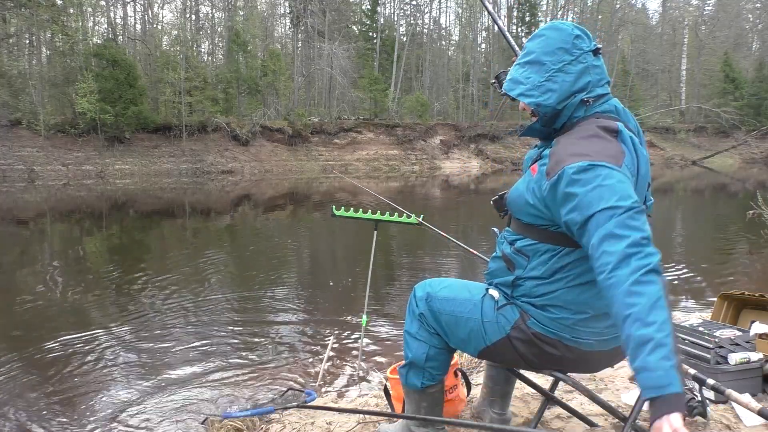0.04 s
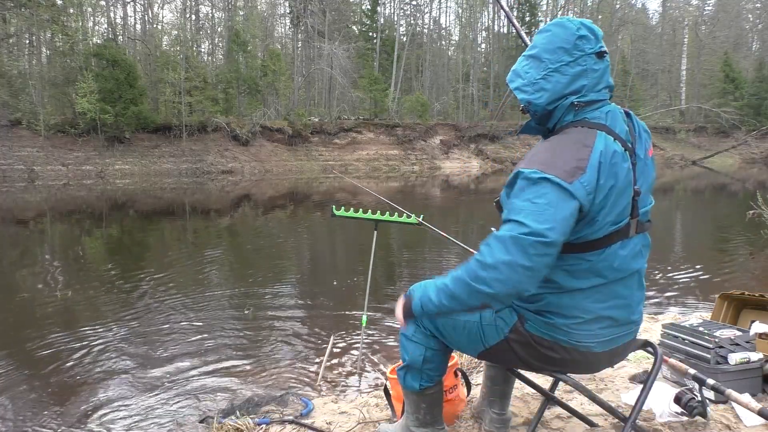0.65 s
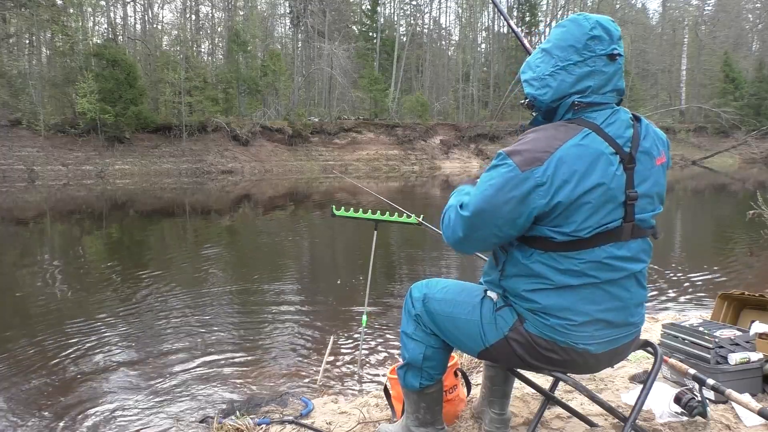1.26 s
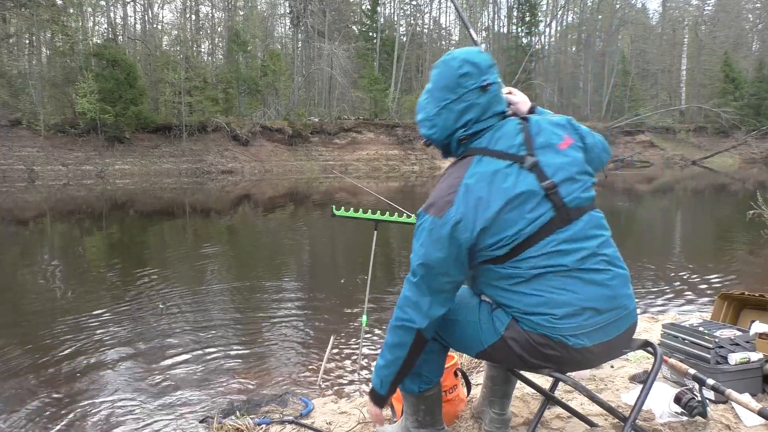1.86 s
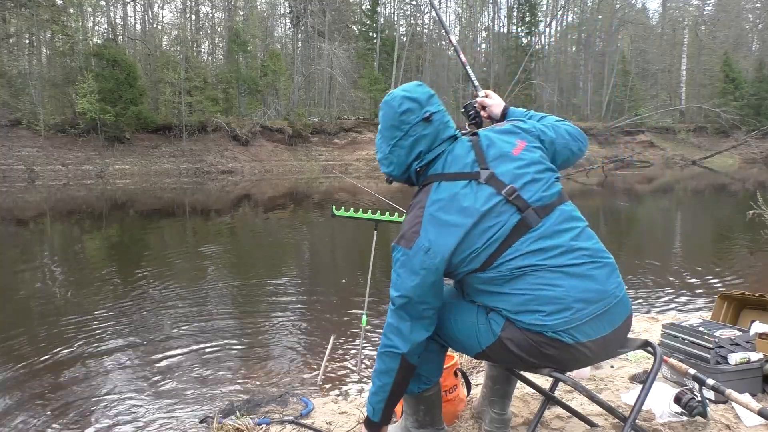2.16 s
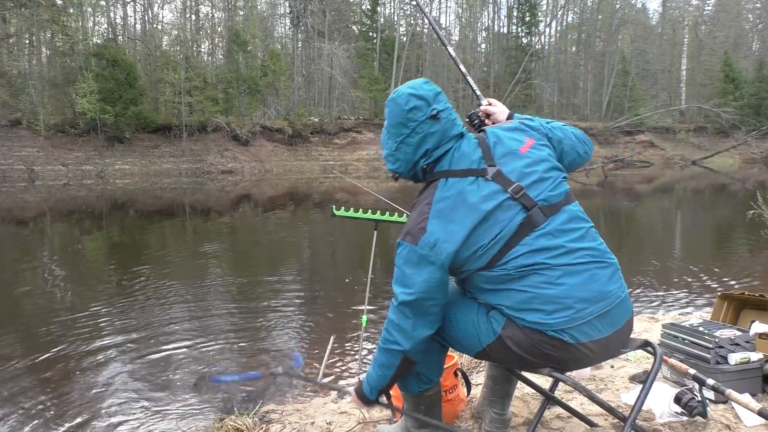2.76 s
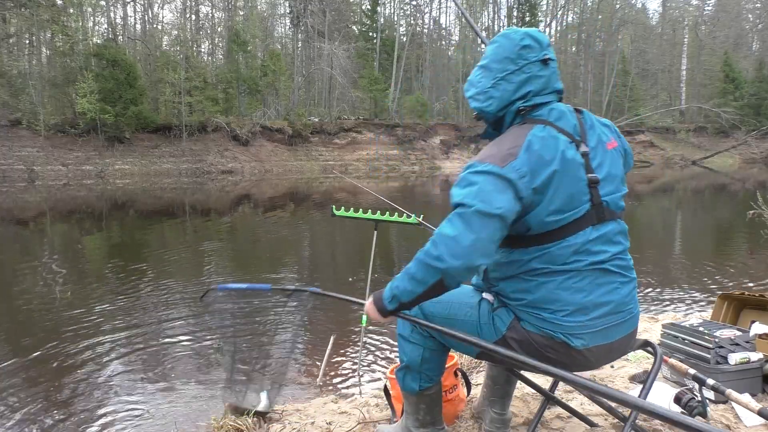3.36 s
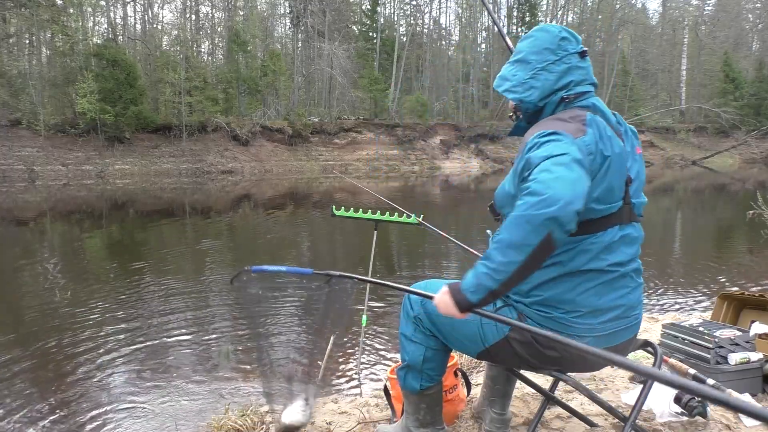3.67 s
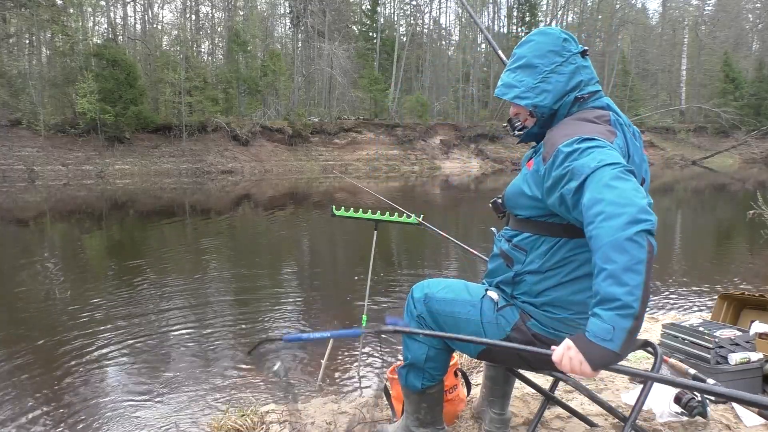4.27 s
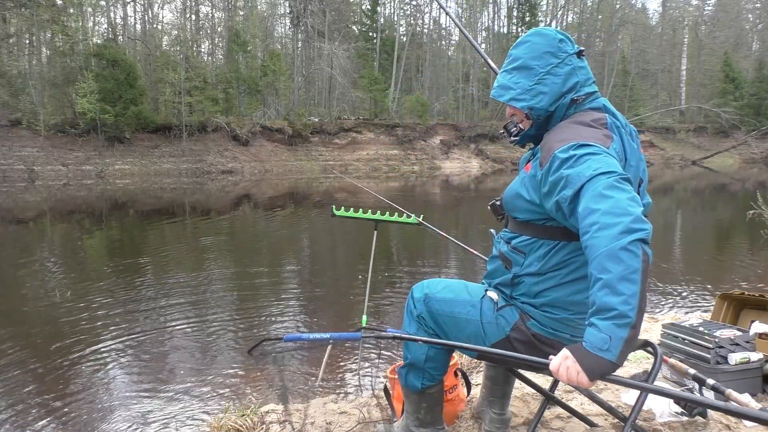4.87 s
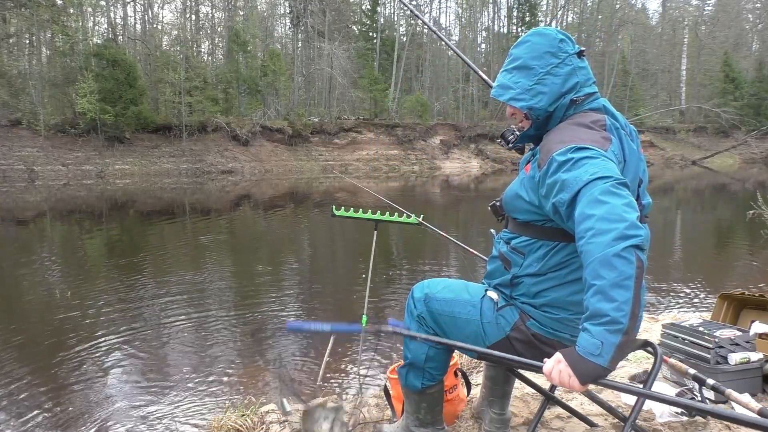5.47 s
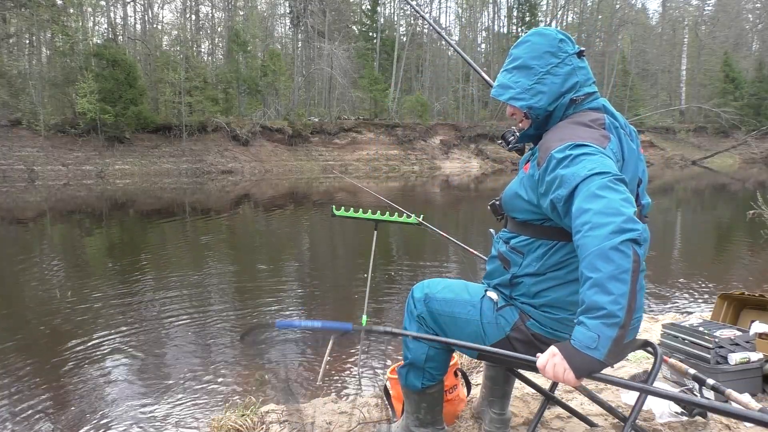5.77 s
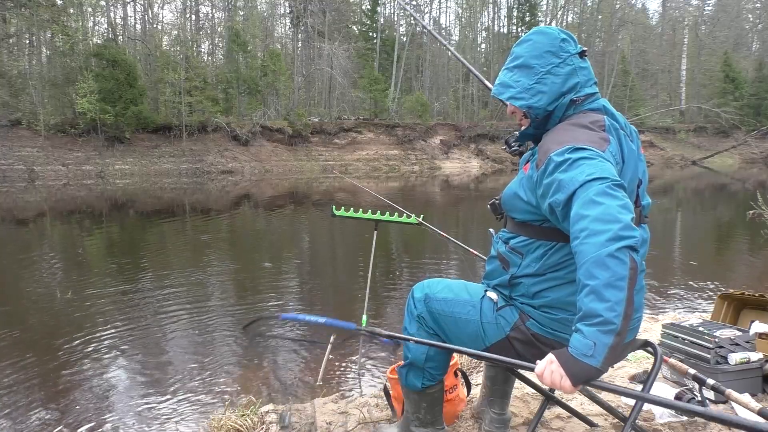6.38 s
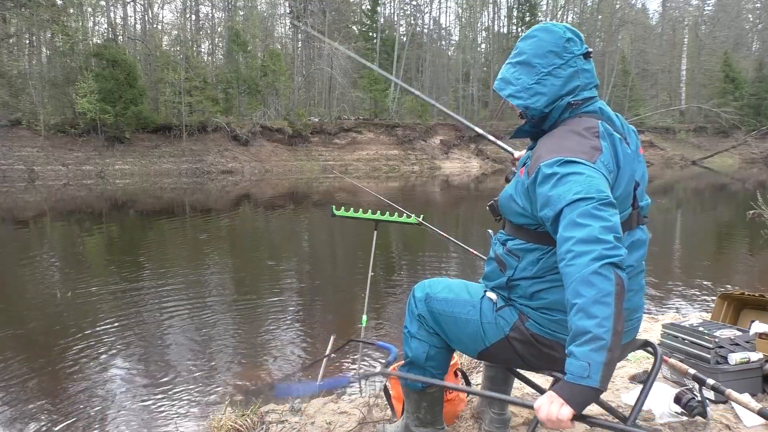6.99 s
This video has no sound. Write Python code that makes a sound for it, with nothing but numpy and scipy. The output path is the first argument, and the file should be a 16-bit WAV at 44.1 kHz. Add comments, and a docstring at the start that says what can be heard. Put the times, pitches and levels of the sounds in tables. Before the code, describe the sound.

On a quiet riverbank, birds call with short whistles and slides, and a distant falling note repeats among the trees. Nearby, a stiff jacket rubs and crinkles, with scattered small clicks of fishing gear. A landing net's handle clacks once, the loudest sound, as the birdsong thins. A fish then jerks in the dripping net, swishing and thumping softly on the sandy bank, and the birds pick up again near the end.

```python
"""Songbirds whistle along a wooded river in spring: stepped calls and slides nearby, a falling note
repeated far off, and late on a run of sinking notes. Each note is a wavering tone echoed by the trees.
Meanwhile an angler lifts a landing net: his jacket rustles, water drips in tiny ringing bubbles and
the hollow handle clacks once. The fish flaps in the wet mesh and thumps on the sandy bank."""
import sys
import numpy as np
from scipy import signal
from scipy.fft import rfft, irfft, next_fast_len
from scipy.io import wavfile
from scipy.ndimage import uniform_filter1d, map_coordinates

SR = 44100
rng = np.random.default_rng(int(sys.argv[2]) if len(sys.argv) > 2 else 0)


def generate_wav(sig):
    """Save sig (samples, or channels by samples) to the path in sys.argv[1] as 16-bit PCM at SR."""
    pcm = np.round(np.clip(np.atleast_2d(sig).T, -1, 1) * 32767).astype(np.int16)
    wavfile.write(sys.argv[1], SR, pcm)


N = 318822

# how hard the jacket rubs: time_s, level_db
JACKET_EFFORT = [(0.0, -53.5), (0.74, -59.5), (1.35, -58), (1.57, -63.5), (2.01, -62.5), (2.41, -56),
                 (2.9, -62), (3.9, -56), (4.95, -63), (5.36, -72), (5.66, -68.5), (5.84, -61.5),
                 (6.4, -69.5), (6.84, -66.5), (7.09, -63)]
# jerks of the net as it is moved and as the fish flaps: centre_s, length_s, level_db
NET_JERKS = [(.785, 0.008, -38), (4.493, 0.008, -47), (5.046, 0.026, -47.5), (5.166, 0.006, -50),
             (5.32, 0.026, -54.5), (5.379, 0.02, -51.5), (5.638, 0.01, -48), (5.669, 0.02, -47.5),
             (5.803, .018, -52), (5.837, 0.022, -45.5), (5.94, 0.024, -49.5), (6.127, .016, -51),
             (6.397, .016, -46.5), (6.45, 0.024, -50.5), (6.631, 0.006, -50.5), (6.753, 0.012, -51),
             (6.903, 0.025, -43.5), (7.052, 0.038, -51)]
# tone colour of hissing cloth: frequency_hz, gain_db
HISS_COLOUR = [(3000, -10), (5500, 2.5), (7000, -2), (10500, -1.5), (13000, -6), (15500, -10.5)]
# tone colour of wet mesh: frequency_hz, gain_db
MESH_COLOUR = [(100, -31), (333, -8.5), (750, -19), (1100, -0.5), (1950, -1.5), (4100, -4.5), (7000, -16),
               (11000, -16.5), (15500, -29)]


def amp(db):
    """Turn decibels into a gain."""
    return 10 ** (np.asarray(db) / 20)


def unit(x):
    """Scale a sound to an average (rms) strength of 1."""
    return x / np.sqrt(np.mean(x ** 2) + 1e-20)


def along(points, hz):
    """Read between (frequency, value) points on a log frequency scale."""
    freqs, values = np.transpose(points)
    return np.interp(np.log(hz + 1), np.log(freqs + 1), values)


def curve(points):
    """Join (time, value) points into one value per sample."""
    return np.interp(np.arange(N) / SR, *np.transpose(points))


def seconds(length):
    """The sample times of a short sound."""
    return np.arange(max(int(length * SR), 2)) / SR


def wobble(rate, size=N):
    """A smooth curve through `rate` random values a second."""
    return map_coordinates(rng.standard_normal(int(size * rate / SR) + 4), [np.arange(size) * rate / SR])


def swells(strokes, rise=0.91, fall=1.26):
    """The force of strokes: each grows faster than it fades."""
    t = np.arange(N) / SR
    return sum(amp(db) * np.exp(-np.maximum((s - t) / rise, (t - s) / fall) ** 2 / length ** 2)
               for s, length, db in strokes)


def add(track, s, sound):
    """Mix a sound into the track at s seconds."""
    start = min(round(s * SR), N - 1)
    sound, start = sound[..., max(-start, 0):], max(start, 0)
    track[..., start:start + sound.shape[-1]] += sound[..., :N - start]


def filtered(x, response):
    """Scale each frequency of a sound by response(hz)."""
    size = next_fast_len(x.shape[-1] + 4096)
    return irfft(rfft(x, size) * response(np.fft.rfftfreq(size, 1 / SR)), size)[..., :x.shape[-1]]


def stereo(pair, spectrum, wide_db=0):
    """Colour two noises: mid is what both ears share, side is how they differ."""
    # stereo width: frequency_hz, side_over_mid_db
    width = [(30, 0), (90, -16), (4000, -20.5), (7500, -1.5), (12000, -6.5)]
    side_db = lambda hz: np.minimum(along(width, hz) + wide_db, 0)
    mid, side = filtered(pair, lambda hz: amp([along(spectrum, hz), along(spectrum, hz) + side_db(hz)]))
    return np.array([mid + side, mid - side]) / np.std(mid)


def noise(spectrum, size=N, wide_db=0):
    """Smooth stereo noise with the given tone colour."""
    return stereo(rng.standard_normal((2, size)), spectrum, wide_db)


def crackle(spectrum, grain_db, rate):
    """Noise in tiny grains, as a surface sticks and slips."""
    return stereo(rng.standard_normal((2, N)) * amp(grain_db * np.clip(wobble(rate), -2, 2)), spectrum)


def burst(spectrum, t60):
    """A sharp hit with a peak of 1 that fades by 60 dB in t60 seconds."""
    t = seconds(.1)
    shape = amp(-60 * t / t60) * (1 - np.exp(-t / 0.00022))
    sound = stereo(rng.standard_normal((2, len(t))) * shape, spectrum)
    return sound / np.abs(sound).max()


def whistle(hz, rise, fall, waver=0.003, flutter_db=2, overtone_db=-36):
    """A wavering tone with a softer octave; rise and fall are shares of its length."""
    u = np.linspace(0, 1, len(hz))
    phase = 2 * np.pi * np.cumsum(hz * (1 + waver * wobble(248, size=len(hz)))) / SR
    fade_in = np.sin(np.pi / 2 * np.clip(u / rise, 0, 1))
    fade_out = np.sin(np.pi / 2 * np.clip((1 - u) / fall, 0, 1))
    flutter = amp(flutter_db * wobble(88, size=len(hz)))
    return fade_in * fade_out * flutter * (np.sin(phase) + amp(overtone_db) * np.sin(2 * phase))


def song(notes, rise, fall, waver=0.0065):
    """Bird notes curve through evenly spaced pitches; much waver makes them hoarse."""
    track = np.zeros(N)
    for s, length, db, *pitches in notes:
        arc = np.polyfit(np.linspace(0, 1, len(pitches)), pitches, len(pitches) - 1)
        hz = np.polyval(arc, seconds(length) / length)
        add(track, s, amp(db) * whistle(hz, rise, fall, waver))
    return track


def placed(voice, left_db, left_lead_s=.000023):
    """A bird off to one side differs a little in level and arrival time between the ears."""
    sides = np.array([[.5], [-.5]])
    return filtered(voice, lambda hz: amp(left_db * sides) * np.exp(2j*np.pi * hz * left_lead_s * sides))


def woods(x, build_s, early_db=-10, linger=1):
    """Near trunks scatter the sound first, then a blurred echo fades; linger stretches it."""
    # echo among the trunks: frequency_hz, fade_time_s
    fade_times = [(300, 0.63), (2000, 2), (4200, 0.4307), (9000, 0.18)]
    hz, t, bands = signal.stft(rng.standard_normal((2, SR)), SR, nperseg=256)
    fade = amp(-60 * t / (linger * along(fade_times, hz)[:, None]))
    tail = signal.istft(bands * fade, SR, nperseg=256)[1]
    t = np.arange(tail.shape[1]) / SR
    tail = tail * (1 - np.exp(-t / build_s)) * (1 + amp(early_db) * np.exp(-t / 0.015))
    mid, side = signal.fftconvolve(x[None], tail / np.linalg.norm(tail[0]), axes=1)[:, :N]
    return mid + 0.33 * np.array([side, -side])


def river_air():
    """The air over the river is a faint, wide hiss."""
    # tone colour of the air: frequency_hz, gain_db
    colour = [(86, -16), (156, -7.5), (600, -15), (1100, -12), (2900, -1), (4150, -11.5), (7100, -13),
              (11000, -11.5), (15500, -16.5)]
    return amp(-65.5) * noise(colour, wide_db=11.5)


def flock(levels, centre_hz, spread, glide=0.1703, count=420):
    """Many short, curling notes blur together; each of four perches has its own echo."""
    perches, u = np.zeros((4, N)), np.linspace(-1, 1, len(seconds(.03)))
    starts = (np.arange(count) + rng.random(count)) * N / SR / count
    for k, (s, (pitch, slope, curl, size)) in enumerate(zip(starts, rng.uniform(-1, 1, (count, 4)))):
        hz = centre_hz * np.exp(spread * pitch + glide * (slope * u + curl * u * u / 2))
        add(perches[k % len(perches)], s, amp(5 * size) * whistle(hz, rise=0.24, fall=0.35))
    echoes = sum(woods(voices, build_s=0.0025, early_db=11) for voices in perches)
    return amp(curve(levels) - 2) * unit(echoes)


def chorus():
    """Two flocks twitter far off, the smaller birds higher in pitch."""
    # loudness of the lower and the higher flock: time_s, level_db
    low = [(0, -47), (.5, -52), (1.5, -53), (2.9, -55.5), (3.25, -62.5), (3.7, -56), (5.2, -80), (6.1, -61),
           (7.23, -62)]
    high = [(0, -57.5), (2.9, -71), (3.5, -57.5), (4.3, -64), (5.2, -80), (6.1, -63)]
    return flock(low, centre_hz=3303, spread=.22) + flock(high, centre_hz=4750, spread=.15)


def far_birds():
    """Clear and hoarse notes hang in the trees; one bird gives its falling call three times."""
    # clear notes, thin high slides and hoarse notes: start_s, length_s, level_db, then each pitch_hz
    clear_notes = [(.13, .16, -45, 3020, 3250, 3750), (.27, .16, -47.5, 3490, 3444, 3490),
                   (1.43, .17, -46.5, 5300, 4700, 4690), (1.83, .064, -51, 5310, 5320, 5250),
                   (3.365, .056, -43, 4530, 4470, 4430), (3.44, .036, -44, 4420, 4580, 4420),
                   (3.645, .064, -44, 3450, 3900, 4080), (3.92, .14, -53, 4760, 4650),
                   (5.22, .13, -62, 3150, 2890, 3170)]
    thin_notes = [(0.788, 0.1, -64, 8000, 7780), (1.909, .066, -56.5, 5930, 5875),
                  (3.15, 0.16, -67, 6950, 6500)]
    rasps = [(1.6, .085, -50, 3800, 4300, 4150), (2.962, .045, -47, 3900, 3450, 3380),
             (3.715, .07, -46, 4000, 3930, 3930)]
    # the falling call and its hoarse ending: offset_s, length_s, level_db, then each pitch_hz
    call = [(-.02, .035, -55, 5650, 5500, 5100), (0, .08, -42, 4850, 4286, 4133, 4097, 4093)]
    ending = (.1, .04, -47, 3550, 4050, 3400)
    # when that call comes: start_s
    starts = [1.814, 2.097, 2.39]
    calls = [(start + s, *rest) for start in starts for s, *rest in call]
    endings = [(start + ending[0], *ending[1:]) for start in starts]
    hoarse = song(rasps + endings, rise=.2, fall=.3, waver=.05)
    voice = song(clear_notes + thin_notes + calls, rise=0.2, fall=0.18) + hoarse
    echo = woods(voice, build_s=.003, early_db=5, linger=2.8)
    return amp(-.5) * placed(voice, left_db=-2.0) + amp(-6) * echo


def warbler(start_s=6.539, period_s=.0915, note_s=0.029, scoop=.18, count=8):
    """A few single notes, then an even run that sinks and swells; each note hooks up to its pitch."""
    # single notes before the run: start_s, level_db, pitch_hz
    opening = [(5.443, -59, 3690), (5.53, -60, 3510), (5.959, -49, 3850), (6.28, -53.5, 3527)]
    first_hz, drop_hz, loudest_at = 4330, 1150, 0.69
    run = [(start_s + k * period_s, -49.7 - 18 * (u - loudest_at) ** 2, first_hz - drop_hz * u ** 1.4)
           for k, u in enumerate(np.linspace(0, 1, count))]
    # a softer falling flick leads into each note of the run
    flicks = [(s - .025, 0.02239, db - 7, hz * 1.27, hz * 1.12) for s, db, hz in run]
    voice = song(flicks, rise=.36, fall=.4, waver=.012)
    for s, db, hz in opening + run:
        climb_s = .0045 * 2 ** rng.uniform(-.5, .5)
        hook = 1 - scoop * np.exp(-seconds(note_s) / climb_s)
        add(voice, s, amp(db) * whistle(hz * hook, rise=0.3, fall=0.25, waver=.007))
    echo = woods(voice, build_s=.004, early_db=5, linger=2)
    return amp(1) * placed(voice, left_db=-1) + amp(-2.5) * echo


def stepped_calls(top_hz=6700, end_hz=3223, drop_s=.017, fall_s=.034):
    """Each call plunges to a pitch of its own, holds it and fades as it falls away."""
    # a near bird's calls: start_s, level_db, held_pitch_hz, hold_s
    calls = [(-.018, -47, 4777, 0.03274), (.295, -45.5, 5134, .026), (0.595, -46.5, 4150, 0.054),
             (.878, -46, 4830, 0.0273), (1.189, -55.5, 5592, .018), (1.492, -49.5, 4070, .035),
             (2.722, -50.5, 4660, 0.029), (3.028, -53, 5530, 0.024)]
    track = np.zeros(N)
    for s, db, held_hz, hold_s in calls:
        corners = np.cumsum([0, drop_s, hold_s, fall_s])
        hz = np.interp(seconds(corners[-1]), corners, [top_hz, held_hz, held_hz, end_hz])
        add(track, s, amp(db) * whistle(uniform_filter1d(hz, size=350), rise=.25, fall=.3))
    return track


def near_birds():
    """Stepped calls, slides and chirps come from the near bank with a light echo."""
    # sliding whistles and quick chirps: start_s, length_s, level_db, then each pitch_hz
    slides = [(.083, .05, -51, 4250, 3750, 3200), (.352, .08, -53, 4200, 4680, 4640, 4250, 3900),
              (.538, .03, -50, 4220, 4500, 4650), (.72, .105, -56, 4850, 5500, 4300),
              (.8, .095, -55, 5300, 4620, 4720), (.915, .088, -53.5, 3900, 3900, 4050, 4420, 5850),
              (.988, .028, -50, 2950, 3100, 3050), (1.098, .12, -50.5, 3850, 3920, 3880, 3850, 3250),
              (1.305, .11, -48.5, 3480, 3720, 3780, 3620, 3000), (1.328, .115, -58, 5200, 5880, 5200),
              (1.545, .06, -52, 4550, 4330, 4200), (1.672, .128, -53, 4350, 2980, 2900, 3300, 3600),
              (1.9, .115, -55, 3200, 2930, 3620)]
    chirps = [(1.781, .018, -54, 6300, 3400), (3.128, .022, -54, 4700, 4200),
              (3.143, .014, -57, 4400, 6300), (3.336, .02, -53, 6100, 3900)]
    voice = stepped_calls() + song(slides + chirps, rise=0.14, fall=.18)
    direct = placed(voice, left_db=0.4429, left_lead_s=-0.0000264)
    return amp(1.2) * direct + amp(-9) * woods(voice, build_s=0.0039)


def jacket(rub_db=3.5, hiss_db=-6):
    """Waterproof cloth rubs and hisses as the arms move; a sweeping sleeve adds hiss."""
    # tone colour of rubbing cloth: frequency_hz, gain_db
    colour = [(60, -39), (170, -17), (430, -5.5), (700, -14), (1150, 2), (4000, -1), (5200, -5.5),
              (6500, -17), (12000, -72)]
    # sweeps of a sleeve: centre_s, length_s, level_db
    sleeves = [(2.42, 0.2, -64), (3.52, 0.24, -63), (3.92, 0.102, -54)]
    effort, folds = amp(curve(JACKET_EFFORT)), amp(1.43 * wobble(28))
    rub = amp(rub_db) * effort * crackle(colour, grain_db=3.0, rate=450)
    hiss_level = np.hypot(amp(hiss_db) * effort, swells(sleeves))
    return folds * (rub + hiss_level * crackle(HISS_COLOUR, grain_db=2.0, rate=660))


def contacts(rows, t60):
    """Light touches, each a bright spit of hiss over a duller tick, its body."""
    # tone colour of the body: frequency_hz, gain_db
    body = [(150, -38), (400, -8), (750, -22), (1150, 5.5), (2200, 4), (4000, -0.5), (6500, -18),
            (15000, -41)]
    track = np.zeros((2, N))
    for s, db, body_db in rows:
        touch = burst(HISS_COLOUR, t60=0.014) + amp(body_db) * burst(body, t60)
        add(track, s + .0005, amp(db) * touch)
    return track


def crinkles(over_db=2, scatter_db=6.5, body_range_db=12, count=130):
    """Stiff folds of the jacket flip with tiny ticks, dull or bright, louder as it rubs harder."""
    level_db = curve(JACKET_EFFORT) + over_db
    rows = [(when * N / SR, level_db[int(when * N)] + scatter_db * size, body_range_db * dull - 2)
            for when, size, dull in rng.random((count, 3))]
    return contacts(rows, t60=0.013)


def wet_folds(x, depth_db=4):
    """Wet folds open and close, each boosting a narrow band of pitch for a moment."""
    bands = signal.stft(x, nperseg=512)[2]
    patches = uniform_filter1d(rng.standard_normal(bands.shape[1:]), size=3, axis=0)
    patches = uniform_filter1d(patches, size=4, axis=1)
    gain = amp(depth_db * np.clip(unit(patches), -2, 2))
    return unit(signal.istft(bands * gain, nperseg=512)[1][:, :N])


def swishes():
    """Each jerk drags the wet mesh in a gritty, gargling swell that comes in clumps."""
    clumps = unit(amp(2.5 * np.clip(wobble(170), -2, 2)))
    grit = crackle(MESH_COLOUR, grain_db=2.5, rate=740)
    return amp(-.3) * swells(NET_JERKS) * clumps * wet_folds(grit)


def drops(start_s, centre_hz, spread, cycles, level_db, count):
    """Water in the mesh rings in tiny rising blips, as strong as the jerk that throws it."""
    track, t, force = np.zeros(N), seconds(.03), swells(NET_JERKS)
    starts = rng.uniform(start_s, (N - 1) / SR, count)
    for s, (pitch, size) in zip(starts, rng.uniform(-1, 1, (count, 2))):
        hz = centre_hz * np.exp(spread * pitch)
        shape = np.exp(-hz * t / cycles) * (1 - np.exp(-hz * t))
        bubble = shape * np.sin(2 * np.pi * hz * t * (1 + 4 * t))
        add(track, s, force[int(s * SR)] * amp(level_db + 10 * size) * bubble)
    return track


def droplets():
    """Crisp spits of water are shaken from the mesh."""
    return drops(start_s=0, centre_hz=3000, spread=.8, cycles=2, level_db=1, count=800)


def gurgles():
    """Bubbles ring longer and lower once the fish flaps."""
    return drops(start_s=5.2, centre_hz=1600, spread=.38, cycles=8, level_db=-2, count=240)


def thumps():
    """Soft blows on sand give a dull push with no ring."""
    # blows on the ground: start_s, length_s, level_db, pitch_hz
    blows = [(0.782, .02, -49.5, 185), (0.887, 0.037, -60, 202), (4.995, 0.0215, -57, 260),
             (5.518, 0.036, -62, 242), (5.657, 0.0082, -53.5, 273.8), (6.386, .012, -58.5, 288),
             (6.625, 0.038, -61, 236), (6.883, 0.02, -54, 306)]
    # tone colour of sand: multiple_of_pitch, gain_db
    sand = [(.25, -28), (.5, -10), (.8, -1.5), (1.3, 2), (1.8, -7), (8, -37)]
    track, t = np.zeros((2, N)), seconds(.25)
    for s, length, db, hz in blows:
        shape = (1 - np.exp(-t / 0.0051)) * np.exp(-(t / length) ** 1.23)
        push = shape * noise(np.array(sand) * [hz, 1], size=len(t))
        add(track, s, amp(db + 1) * push * np.sqrt(length * SR / np.sum(push[0] ** 2)))
    return track


def ticks(rise_cycles=0.92, ring_db=-14, ring_cycles=2.6, grit_db=-10):
    """Each tick is a crisp blip with some grit and a short ring that depends on the spot struck."""
    # ticks of tackle and knocks of the net's frame: start_s, level_db, pitch_hz
    knocks = [(.707, -41, 1100), (.909, -38, 1500), (1.1453, -37, 1310), (1.2135, -37, 1360),
              (1.3326, -25, 1570), (2.3477, -29, 1810), (2.4053, -37.5, 1000), (2.4709, -33, 1830),
              (2.7468, -41, 1000), (2.941, -33.5, 2840), (4.043, -31.5, 2182), (4.2504, -34, 2170),
              (4.6544, -34, 920), (4.975, -39, 1020), (5.93, -37, 1900), (5.953, -39, 2400),
              (6.286, -53, 680), (6.3966, -33, 1730), (6.9014, -26, 4000), (7.089, -48, 780)]
    track, t = np.zeros((2, N)), seconds(.1)
    for (s, db, hz), (spot, damping) in zip(knocks, rng.random((len(knocks), 2))):
        cycles = hz * t
        phase = 2 * np.pi * cycles
        blip = (cycles / rise_cycles * np.exp(1 - cycles / rise_cycles)) ** 3
        ring = amp(ring_db) * np.exp(-cycles / (ring_cycles * (.5 + damping))) * (1 - np.exp(-cycles))
        tone = (blip + ring) * np.sin(phase) + ring * np.sin(phase * (1.3 + spot))
        add(track, s, amp(db) * (tone + amp(grit_db) * burst(MESH_COLOUR, t60=0.021)))
    return track


def snaps():
    """Wet mesh and cloth snap tight."""
    # bright snaps: start_s, level_db, body_gain_db
    pulls = [(3.411, -35, -10), (3.444, -39, -11), (3.807, -39, -5), (4.228, -41, -8), (4.49, -43, 2),
             (4.626, -48, 2), (4.725, -47, 3), (4.974, -44, -2), (5.001, -44, 0), (5.034, -36, 1),
             (5.378, -41, -3), (5.632, -36, 0), (6.142, -44, 3), (6.163, -34.5, 3), (6.431, -44, 2),
             (6.566, -46, -12), (6.742, -39, 0), (6.885, -39, 1)]
    return contacts(pulls, t60=0.024)


def plops():
    """Pockets of air gurgle in the wet net, shaking in pitch and strength as they are squeezed."""
    # squelches of the fish: start_s, length_s, level_db, start_hz, end_hz
    squelches = [(5.672, .012, -46, 1550, 1750), (5.826, .03, -39.5, 1750, 1050),
                 (6.388, .026, -46, 1900, 1500), (6.437, .038, -48, 1250, 1220),
                 (6.768, .012, -47, 1650, 1500), (6.882, .016, -47, 1050, 1200)]
    track = np.zeros(N)
    for s, length, db, start_hz, end_hz in squelches:
        hz = start_hz * (end_hz / start_hz) ** (seconds(length) / length)
        plop = whistle(hz, rise=.3, fall=.35, waver=.14, flutter_db=4.5, overtone_db=-11)
        add(track, s, amp(db - 1.5) * plop)
    return track


def clack(ring_db=-5, ring_t60=0.056):
    """The hollow handle strikes and bounces: hard cracks and a short ring."""
    # the strike and its bounces: start_s, level_db, fade_time_s
    hits = [(4.5427, -22, 0.0225), (4.544, -14.5, 0.0049), (4.5456, -20.5, 0.054), (4.549, -21.5, 0.014),
            (4.5587, -19.5, 0.033)]
    # the handle's ringing tones: pitch_hz, width_hz, level_db
    tones = [(543, 60.1, -17), (1716, 45, 1.5), (2400, 42, -16), (2840.4, 50, -11), (3540, 100, 11),
             (4230, 33, -2), (5000, 180, 7)]
    # tone colour of a crack: frequency_hz, gain_db
    crack = [(200, -59), (560, -10.5), (760, -17.5), (1190, -6), (3500, -3), (4840, -8), (6020, -22),
             (9000, -25), (15500, -43.5)]
    track, t = np.zeros((2, N)), seconds(.1)
    for s, db, t60 in hits:
        ring = np.zeros(len(t))
        for k, (hz, width, level) in enumerate(tones):
            strength = (-1) ** k * amp(level + rng.normal(0, 1.9))
            ring += strength * np.exp(-np.pi * width * t) * np.sin(2 * np.pi * hz * t)
        ring *= amp(-60 * t / ring_t60) * (1 - np.exp(-t / 0.0005))
        add(track, s, amp(db) * (burst(crack, t60) + amp(ring_db) * ring / np.abs(ring).max()))
    track = signal.sosfilt(signal.butter(2, 130, "highpass", fs=SR, output="sos"), track)
    return track + amp(-31) * woods(track[0], build_s=0.079)


def scene():
    """Birds and angler over the quiet air of the river."""
    birds = near_birds() + far_birds() + warbler() + chorus()
    angler = jacket() + crinkles() + swishes() + droplets() + gurgles()
    angler = angler + thumps() + ticks() + snaps() + plops() + clack()
    # the angler's sounds are cut below about 85 Hz, leaving no deep bass
    angler = signal.sosfilt(signal.butter(3, 85, "highpass", fs=SR, output="sos"), angler)
    return birds + angler + river_air()


def record(dry):
    """The very highest treble is cut away."""
    return filtered(dry, lambda hz: hz < 15850)


dry = scene()
out = record(dry)
generate_wav(out)
```